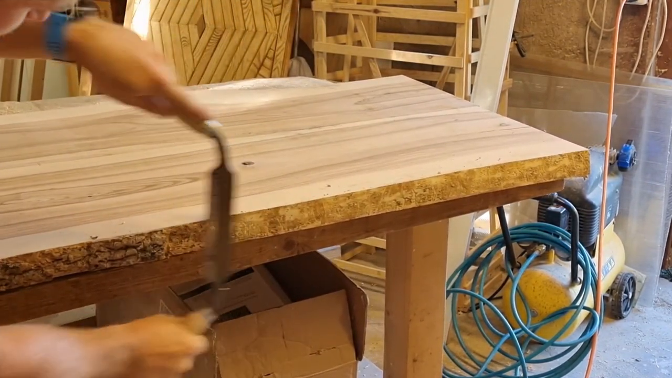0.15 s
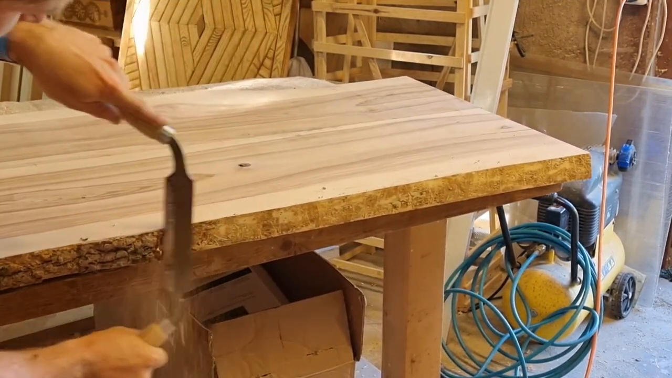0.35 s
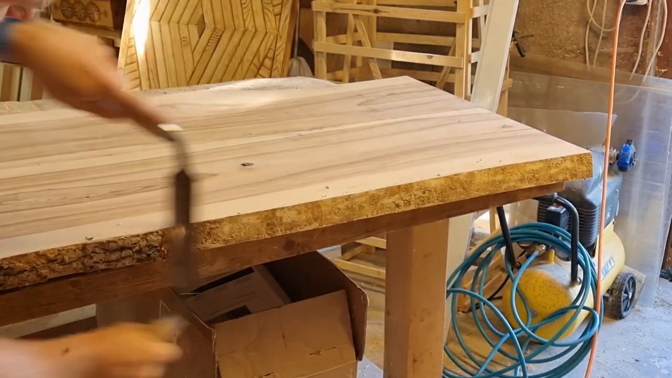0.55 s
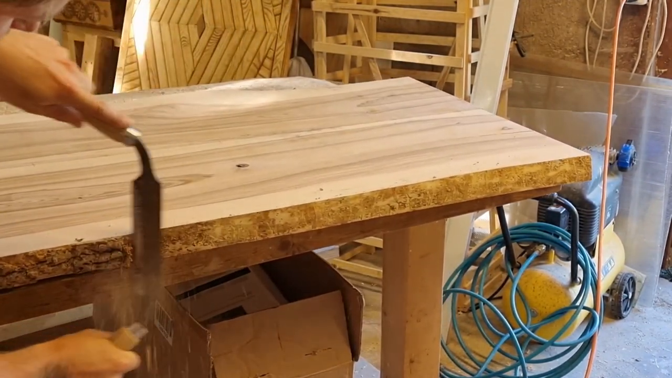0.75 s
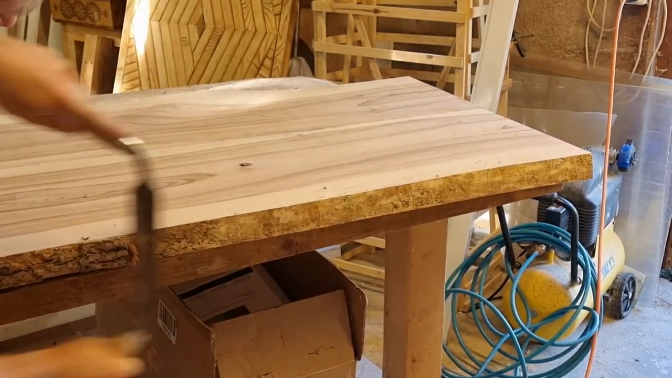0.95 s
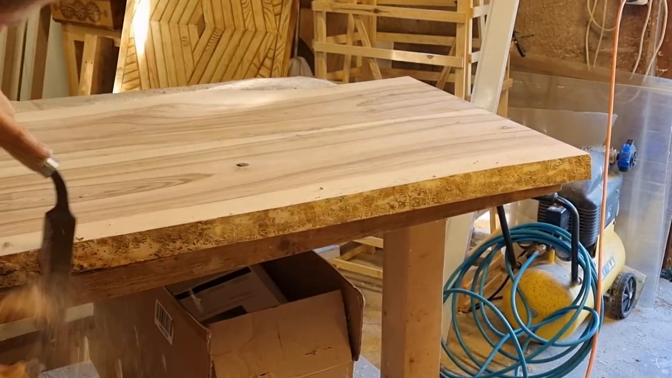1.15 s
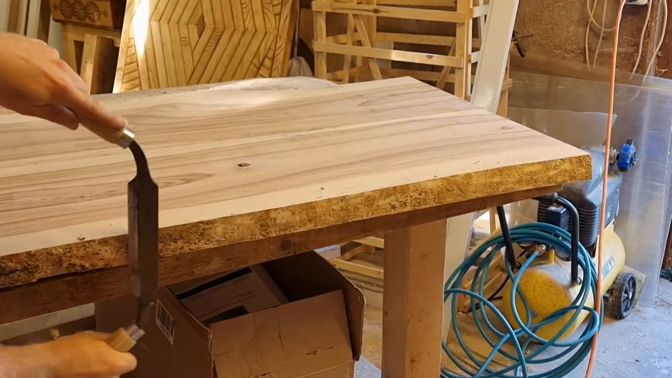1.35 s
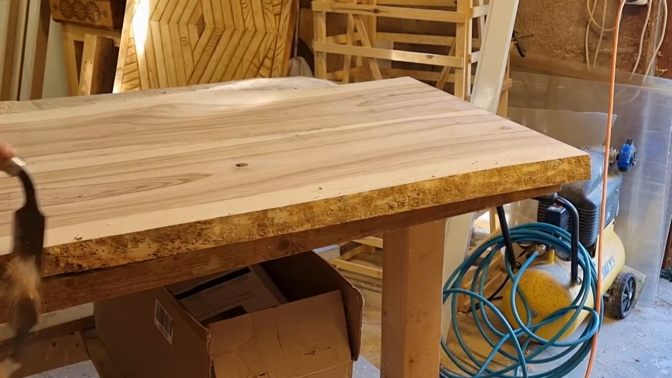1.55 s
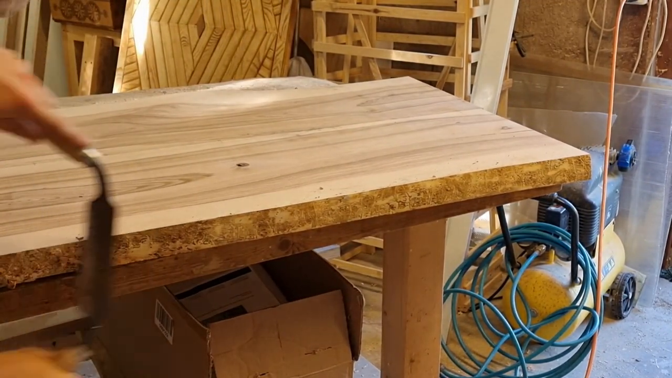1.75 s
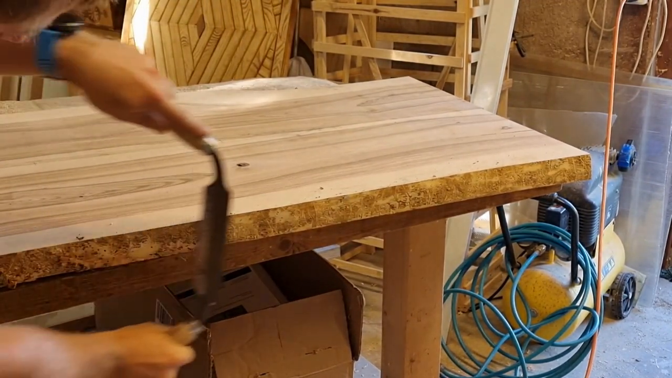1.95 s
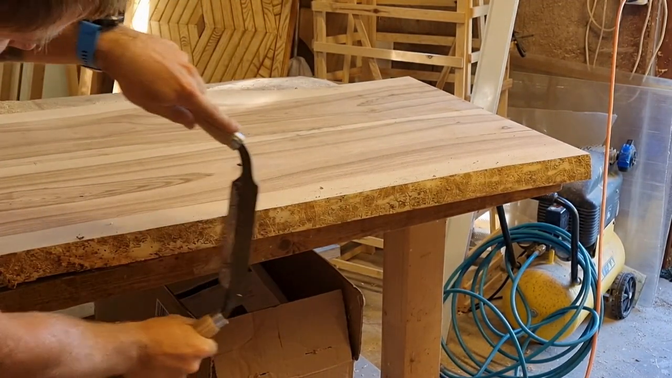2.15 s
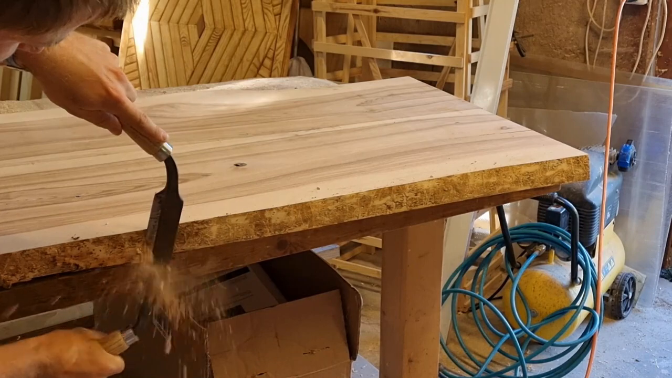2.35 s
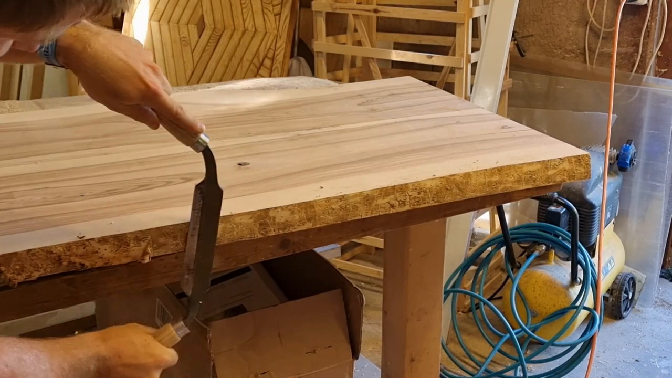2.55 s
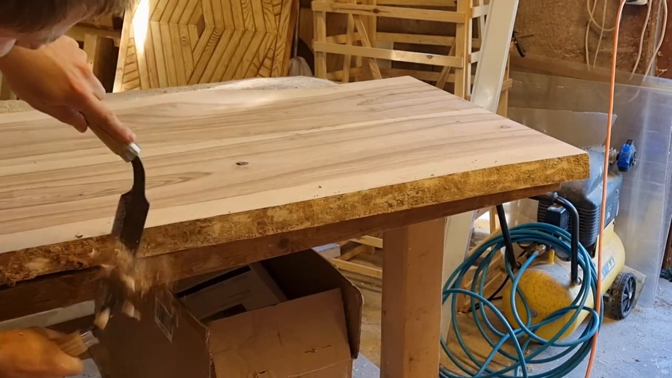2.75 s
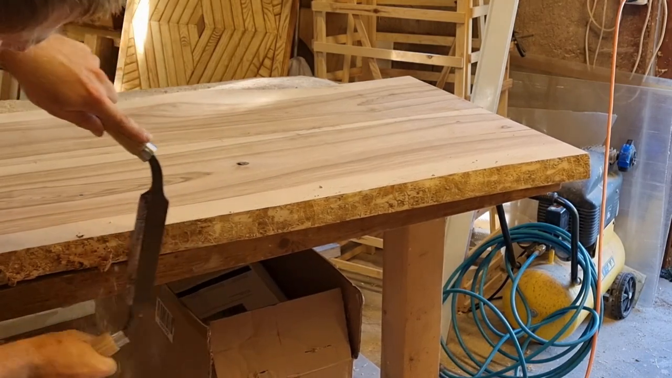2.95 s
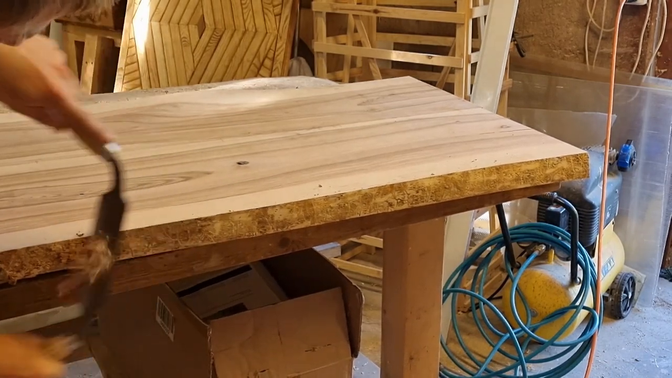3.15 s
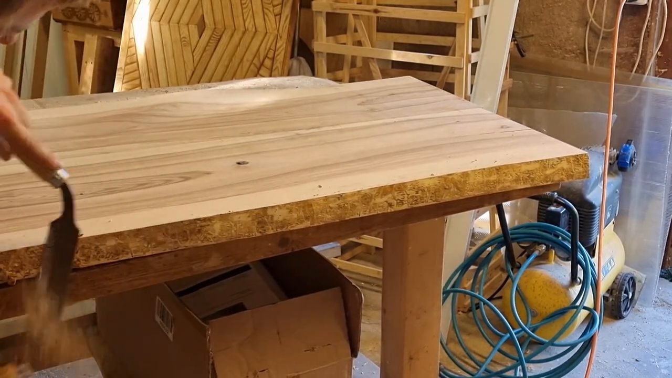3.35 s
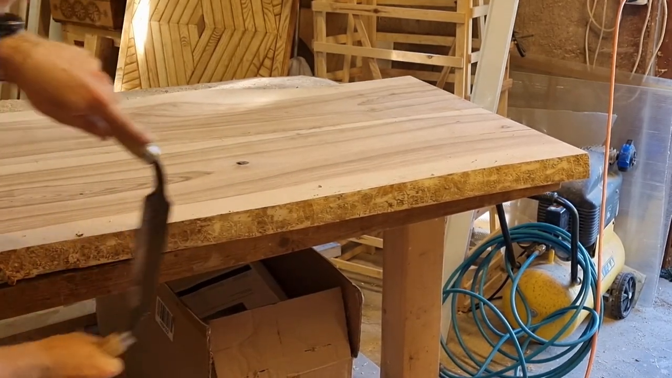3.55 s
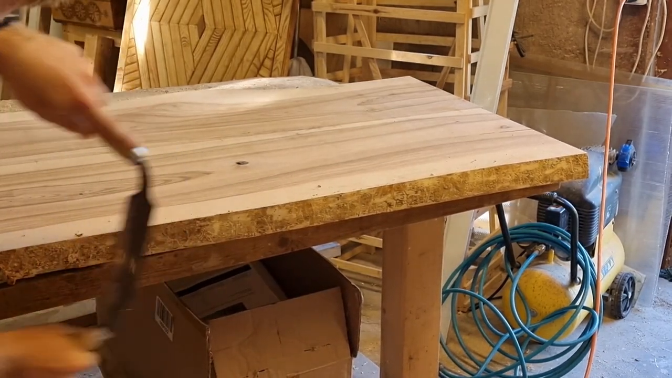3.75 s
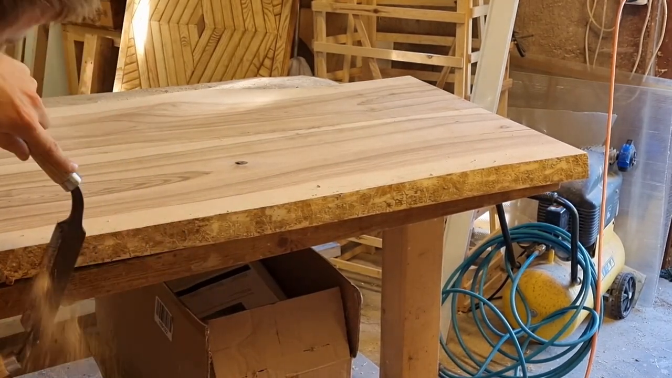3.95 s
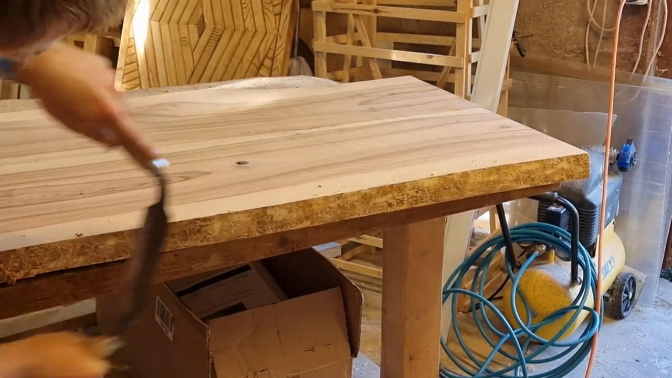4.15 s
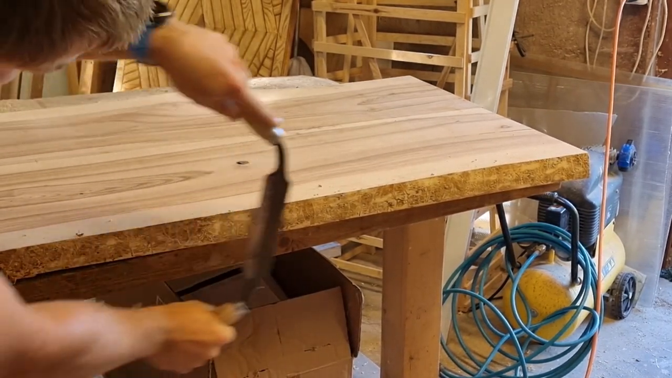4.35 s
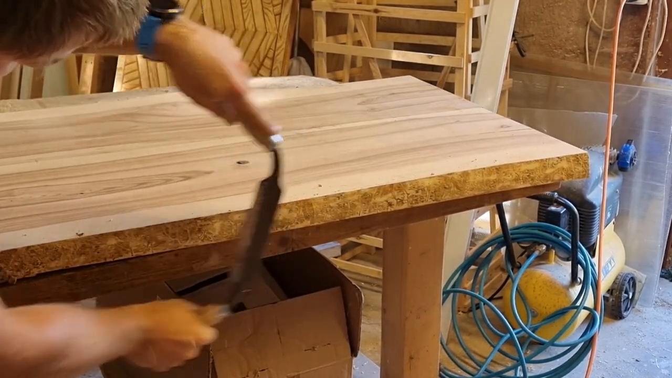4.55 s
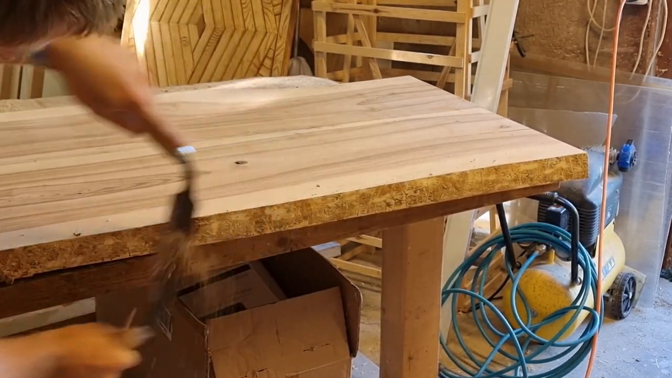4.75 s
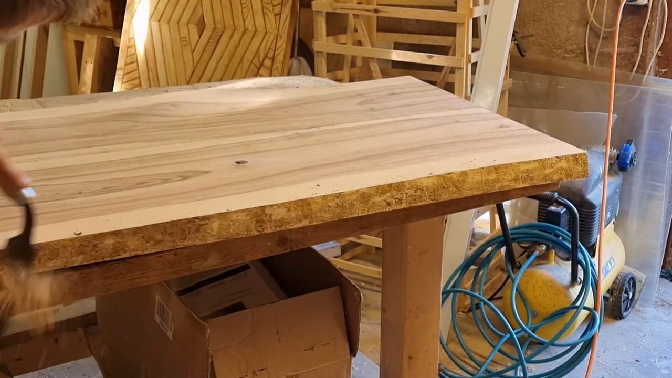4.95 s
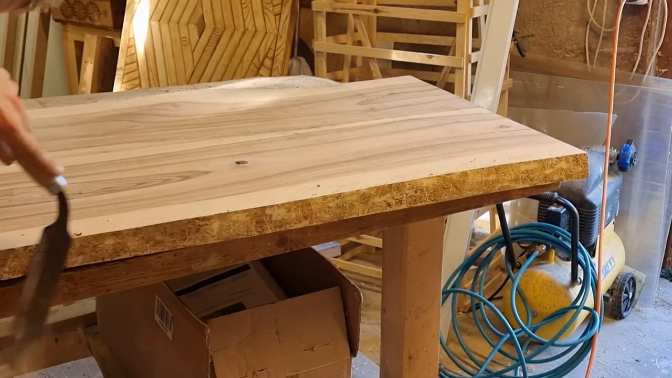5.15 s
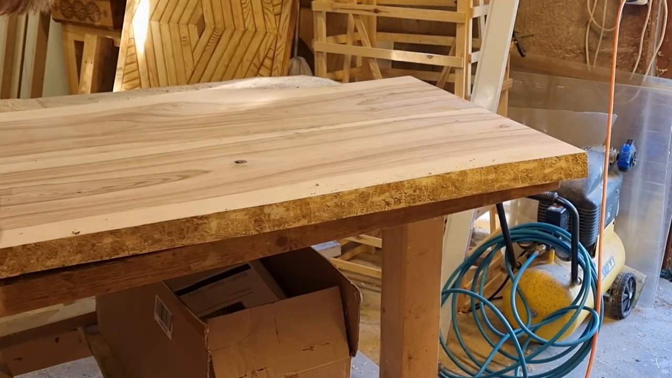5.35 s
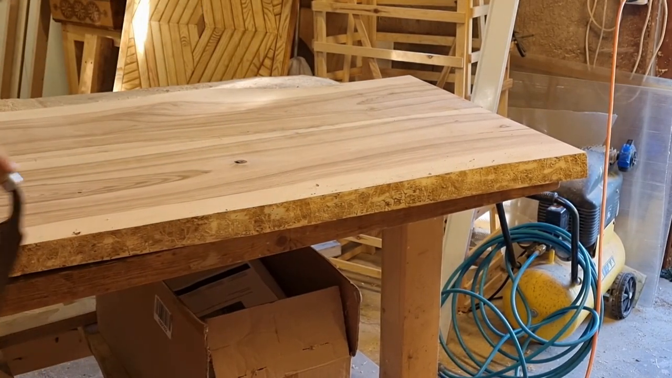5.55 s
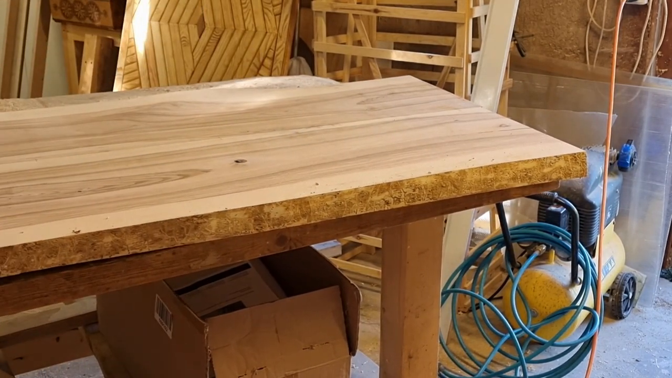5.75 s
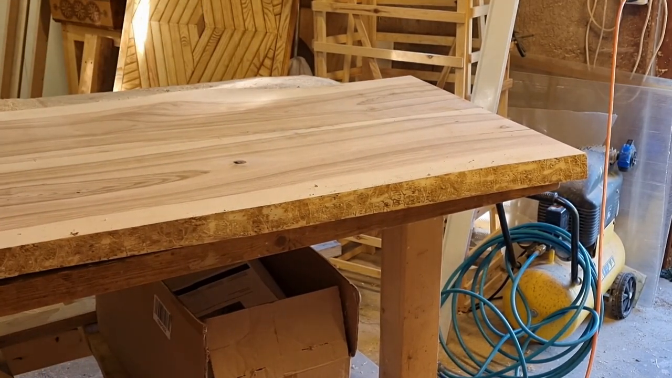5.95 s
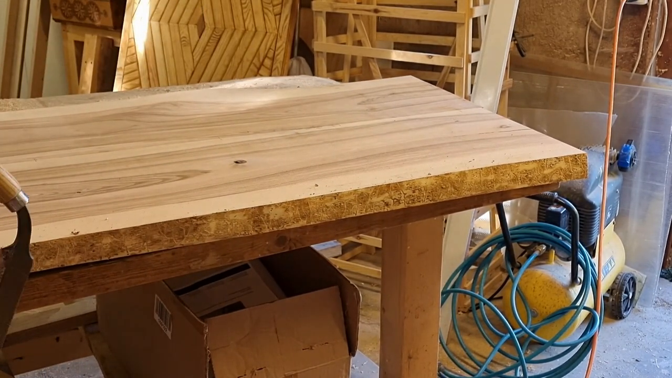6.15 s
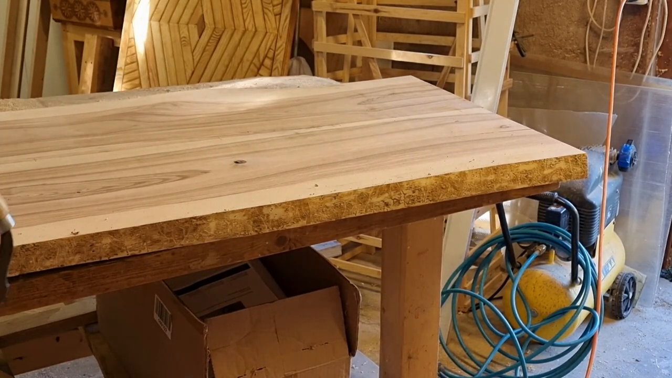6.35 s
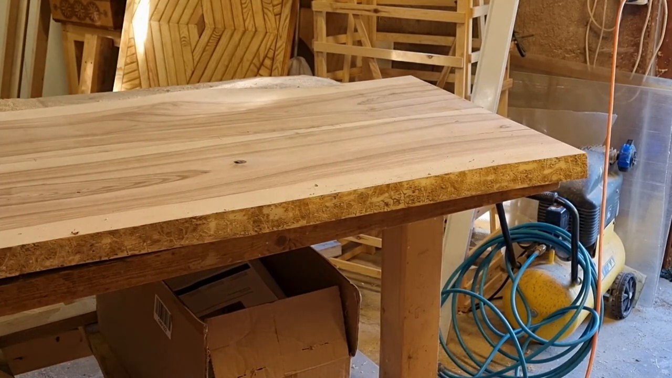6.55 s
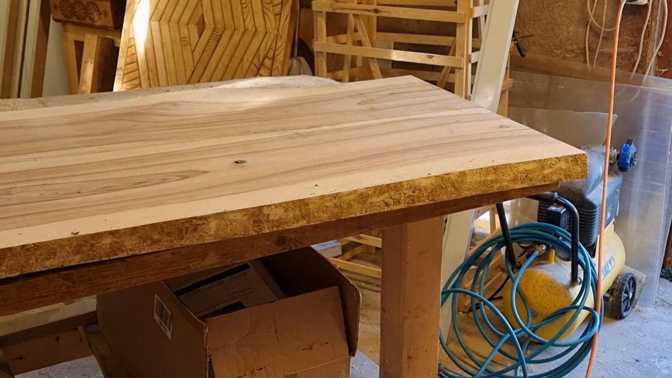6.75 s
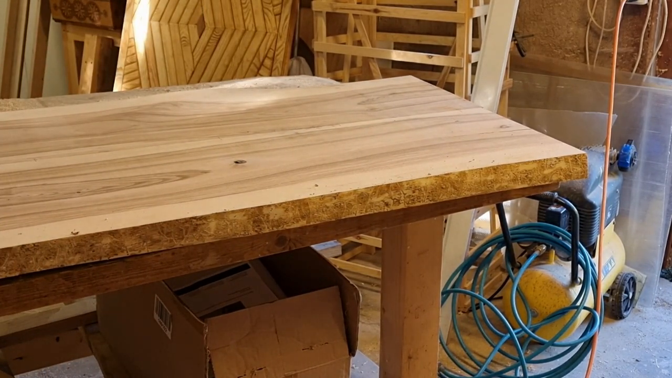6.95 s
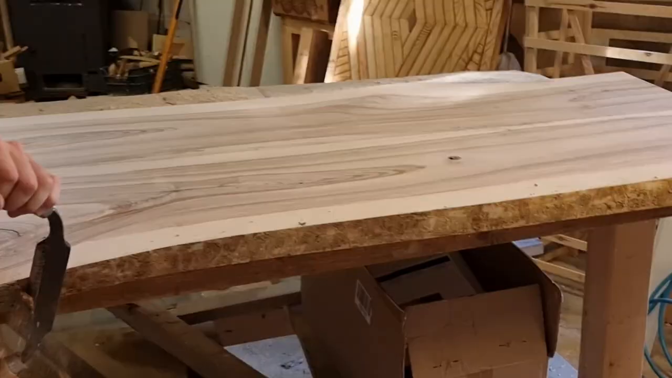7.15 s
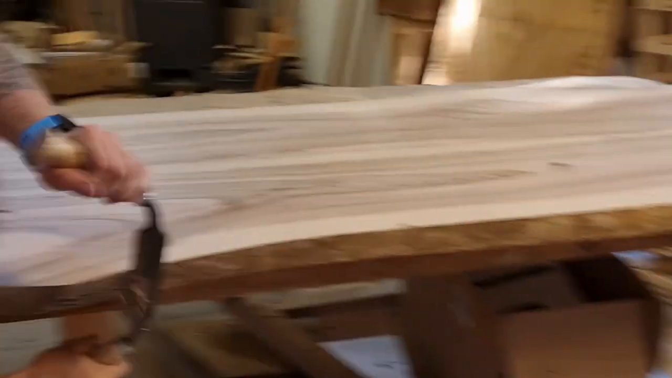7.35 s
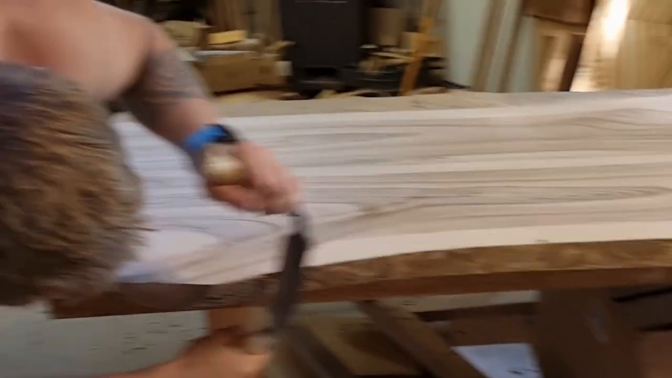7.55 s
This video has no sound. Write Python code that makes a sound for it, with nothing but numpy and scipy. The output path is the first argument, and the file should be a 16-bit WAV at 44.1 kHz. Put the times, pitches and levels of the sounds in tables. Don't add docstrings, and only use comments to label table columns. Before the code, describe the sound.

Close scraping of a blade along a wood edge, fibres ripping brightly, slab shuddering, crumbs trickling, then low handling rumble at the end.

```python
import sys
import numpy as np
from scipy import signal
from scipy.fft import rfft, irfft, next_fast_len
from scipy.io import wavfile
from scipy.ndimage import uniform_filter1d

SR = 44100
rng = np.random.default_rng(int(sys.argv[2]) if len(sys.argv) > 2 else 0)


def makeup_ratio(level_db):
    decades = np.asarray(level_db, float) / 20
    return 10 ** decades


def to_wav(s):
    ch = np.atleast_2d(s).T
    pcm = np.round(np.clip(ch, -1, 1) * 32767)
    wavfile.write(sys.argv[1], SR, pcm.astype(np.int16))


N = 339570


def level(x):
    return x / np.sqrt(np.mean(x ** 2))


def butter_filter(x, order, edge_hz, kind="low"):
    return signal.sosfilt(signal.butter(order, edge_hz, kind, fs=SR, output="sos"), x)


def colour(x, points):
    hz, db = np.transpose(points)
    size = next_fast_len(N)
    f = np.arange(size // 2 + 1) * SR / size + 1
    gain = makeup_ratio(np.interp(np.log(f), np.log(hz), db))
    return irfft(rfft(x, size) * gain, size)[..., :N]


def pair(alike):
    mid, side = rng.standard_normal((2, N))
    return np.sqrt((1 + alike) / 2) * mid + np.sqrt((1 - alike) / 2) * side * np.array([[1], [-1]])


def drift(per_s):
    k = int(SR / per_s)
    steps = np.repeat(rng.standard_normal(N // k + 1), k)
    return level(uniform_filter1d(steps, k)[:N])


def grit(per_s, scatter_db, smear_s):
    sizes = makeup_ratio(scatter_db * np.minimum(rng.exponential(size=N), 4))
    slips = (rng.random(N) < per_s / SR) * sizes
    return level(signal.lfilter([1], [1, -np.exp(-1 / (smear_s * SR))], slips))


def ring(x, modes, patchy_db=0.):
    out = 0
    for k, (hz, width, db) in enumerate(modes):
        gain = makeup_ratio(db + patchy_db * drift(7))
        out = out + (-1) ** k * gain * signal.lfilter(*signal.iirpeak(hz, hz / width, SR), x)
    return out


# pitch_hz, level_db
SHOP_COLOUR = [(18, -48.5), (30, -16.5), (80, 8), (180, -5.5), (676, -0.5), (1030, -5), (1340, 2.5),
               (5030, -12), (7280, -17), (13000, -17), (15400, -22.5), (16500, -47)]


def shop():
    air = colour(pair(0.2), SHOP_COLOUR)
    swelling = 0
    for edges_hz in [(25, 300), (300, 2500), (2500, 17000)]:
        swelling = swelling + makeup_ratio(2.2 * drift(6)) * butter_filter(air, 2, edges_hz, "band")
    return makeup_ratio(-67) * level(swelling)


def contacts(rows, rule):
    start, rise, hold, force_db, bark_db = np.transpose(rows)[:, :, None]
    age = np.arange(N * 1000 // SR + 2) / 1000 - start - rise
    out = []
    for k, (rise_db, db, held, fall) in enumerate(rule):
        shape = rise_db * np.minimum(age, 0) / rise + held * np.clip(age, 0, hold)
        shape = shape - fall * np.maximum(age - hold, 0)
        bark = bark_db if k == 0 else 0
        layer_db = np.maximum(force_db + db + bark + shape, -150)
        out.append(np.sum(makeup_ratio(2 * layer_db), axis=0))
    return np.array(out)


# start_s, rise_s, hold_s, force_db, bark_db (over the force)
PULLS = [(0.0, 0.00047, 0.0022, -40, -12), (.256, 0.047, 0.056, -33.5, -4), (.67, 0.004, 0.099, -31, 0.5),
         (1.652, 0.0038, 0.045, -36, -2), (2.25, 0.11, 0.05, -31.5, -6.5), (2.786, 0.015, 0.059, -28, -6.5),
         (3.236, 0.02, 0.07, -31, -5), (3.82, .1, 0.062, -31.5, -13.5), (4.99, 0.074, 0.016, -25, -11),
         (5.436, 0.0052, 0.05, -26.5, -9), (5.864, 0.0045, 0.0056, -32.5, -1),
         (7.181, 0.0012, 0.0057, -40, -3), (7.455, 0.0036, 0.085, -29.5, -3),
         (7.575, 0.0012, 0.01, -42, 3.5)]
SLIDES = [(.604, 0.0018, 0.043, -40, -6), (1.04, 0.0014, 0.12, -40.5, -8),
          (1.15, 0.024, 0.0069, -27.5, -1.5), (1.4, 0.077, 0.034, -48.5, 1.5),
          (1.506, 0.0014, 0.12, -36.5, -1), (2.092, 0.0013, 0.011, -39, -8), (2.74, 0.04, 0.014, -39, -6.5),
          (3.092, .002, 0.0093, -54.5, 5), (3.2, 0.012, 0.025, -46.5, -11),
          (3.734, 0.0018, 0.0092, -51, 10), (4.407, 0.00097, 0.005, -40, 0),
          (4.695, 0.04, 0.135, -41.5, -15), (4.86, 0.054, 0.13, -41, -8.5), (5.8, 0.065, 0.02, -28, -10),
          (6.089, 0.00088, 0.026, -35.5, -13), (6.288, 0.0009, 0.013, -25, -12.5),
          (7.39, 0.039, 0.0075, -36.5, -2.5)]
RESTS = [(0.0, 0.00068, 0.0083, -50.5, -14), (.15, 0.014, 0.077, -66.5, -22),
         (1.355, 0.0034, 0.013, -62.5, 2), (1.84, 0.036, 0.2, -71, -22.5), (2.14, 0.013, 0.037, -63.5, -14),
         (2.638, .003, 0.022, -59, -25), (3.46, 0.017, 0.057, -71, -20), (3.652, 0.0067, 0.086, -54, -22),
         (4.22, 0.031, 0.082, -64.5, -14.5), (4.33, 0.011, 0.027, -54, 0), (4.62, 0.011, 0.087, -70, -16),
         (5.24, .03, 0.39, -56, -10), (5.69, 0.099, 0.19, -51.5, -32.5), (5.92, 0.026, 0.2, -78, -30),
         (7.181, 0.0013, 0.027, -43.5, -12), (7.3, 0.016, 0.18, -55, -1)]
GRAZES = [
    (.235, 0.0069, .03, -49.5, -23),
    (1.064, 0.0083, 0.052, -24, -9),
    (2.26, 0.037, 0.1, -35.5, -34),
    (3.84, 0.0045, 0.13, -33, -26),
    (5.78, 0.0074, 0.023, -29.5, -30.5),
    (6.262, 0.0033, .02, -37, -32),
    (6.42, 0.0035, 0.074, -39.5, -15.5),
    (6.59, 0.011, 0.042, -41.5, -8.5),
    (6.985, 0.0063, 0.038, -45, -15),
    (7.26, 0.0047, 0.011, -50.5, -1.5),
]
# start_s, length_s, level_db
CRUMBS = [(0.912, .12, -55.5), (1.796, 0.085, -51), (1.87, 0.03, -50), (3.387, 0.37, -60.5),
          (0.084, .1, -66), (1.33, .12, -62), (3.86, 0.11, -48), (1.52, .1, -46), (4.43, .03, -54),
          (4.48, .02, -56), (4.535, 0.038, -55), (4.62, 0.028, -53), (6.47, 0.23, -55.5),
          (6.738, 0.2, -54.5), (0.39, .12, -53), (5.7, 0.027, -60), (7.03, 0.13, -63), (5.2, 0.23, -68),
          (5.6, .15, -66)]
# rise_db, level_db (over the force), held_db_per_s, release_db_per_s
PULL_ANSWER = [
    (31, 4.5, -104.5, 262),
    (16.7, -9, 55, 178.5),
    (20, -1.5, 21.5, 225),
    (14, -17, 14, 148.5),
    (14, -16.5, 40.5, 150.5),
]
SLIDE_ANSWER = [
    (30, -5, 8.5, 220),
    (16, -6.5, -16.5, 243),
    (20.1, 0.5, -8.5, 237),
    (14, -22, 8.5, 320),
    (14, -15.5, 14.5, 110),
]
REST_ANSWER = [
    (25, -8.5, 2, 370),
    (18.2, 6.5, -13.5, 208),
    (19.8, 2, -6, 660),
    (14, -2.5, -3.5, 140),
    (16.2, 13.5, -9.5, 280),
]
LIGHT_ANSWER = [
    (24.7, 2.5, -21.5, 290),
    (18.1, -15.5, -6.5, 240),
    (20.2, -3, -12.5, 200),
    (14, -38.5, 1.5, 150),
    (16, -16.5, -7.5, 180),
]


def effort():
    crumb_rise_s, crumb_hiss_db = 0.031, -7.5
    crumbs = [(start, crumb_rise_s, length, db, crumb_hiss_db) for start, length, db in CRUMBS]
    power = contacts(PULLS, PULL_ANSWER) + contacts(SLIDES, SLIDE_ANSWER)
    power = power + contacts(RESTS, REST_ANSWER) + contacts(GRAZES + crumbs, LIGHT_ANSWER)
    ms = np.arange(N) * 1000 / SR
    return [np.interp(ms, np.arange(len(p)), 10 * np.log10(p)) for p in power]


# pitch_hz, tilt_db
TEAR_COLOUR = [(1470, -8.5), (2500, -4), (3460, 1), (4590, -2.5), (4970, 2), (8500, -12), (9200, -10.5),
               (10700, -9), (13900, -2), (15900, -10), (16500, -42.5)]


def tearing(db):
    common, out = grit(500, 2.8, 0.0024), 0
    for hz in 2200 * 2 ** np.arange(0, 3.1, .5):
        bursts = 0.63 * common + 0.5 * grit(300, 3.8, 0.001) + 0.45
        out = out + butter_filter(bursts * pair(0.4), 2, [hz / 1.17, hz * 1.146], "band")
    return makeup_ratio(db + 2.0) * level(colour(out, TEAR_COLOUR))


# pitch_hz, width_hz, level_db
SLAB_MODES = [(254.7, 21, 1.5), (326.8, 54.7, 1.5), (345.5, 46, 4), (422, 19, -1), (511, 61, -6.5),
              (591, 19, 0.5), (683, 127, -9)]
# pitch_hz, width_hz, level_db
EDGE_MODES = [(808.3, 47, 7.5), (985, 40.5, 7.5), (1087, 117, 2), (1283, 50, 3), (1454, 48, 1.5),
              (1670, 490, -2.5), (1980, 56, -2), (2067, 35, -6), (2540, 270, -8.5), (2490, 200, -8),
              (3000, 570, -9), (3860, 160, -15)]


def slab(drum_db, chatter_db, body_db):
    low = level(ring((grit(400, 2.1, 0.0011) + 0.51) * pair(1.0), SLAB_MODES))
    body = makeup_ratio(body_db) * level(butter_filter(low, 4, 400))
    drum = butter_filter(makeup_ratio(drum_db + 4.5) * low, 2, [190, 760], "band")
    edge = level(ring((grit(350, 3.5, 0.00074) + 2.94) * pair(0.29), EDGE_MODES, patchy_db=3.0))
    chatter = butter_filter(makeup_ratio(chatter_db - 2.5) * edge, 2, 700, "high")
    return drum + chatter + body


# pitch_hz, level_db
THRUM_COLOUR = [(15, -63), (25, -36.5), (43, -10), (70, -9), (96, 0.5), (124, -2.5), (200, -2.5),
                (260, -32), (440, -120)]


def bench_thrum(thrum_db):
    steady_db = -67
    return np.hypot(makeup_ratio(thrum_db), makeup_ratio(steady_db)) * level(colour(pair(0.95), THRUM_COLOUR))


# start_s, length_s, pitch_hz, level_db
SINGING = [(.0, 0.021, 560, -45), (0.157, .035, 1260, -65.5), (0.238, .05, 1310, -51.5),
           (2.096, 0.031, 950, -52), (2.809, 0.084, 342, -38), (1.19, 0.06, 2080, -35),
           (1.172, 0.02, 1330, -29), (0.769, .05, 1880, -36.5), (0.793, 0.028, 3650, -35.5),
           (4.718, 0.043, 2690, -53), (4.727, 0.13, 3150, -60), (4.893, 0.089, 2050, -55),
           (2.298, 0.064, 1310, -39), (2.297, 0.13, 1920, -46), (4.251, 0.16, 1010, -56),
           (6.286, 0.019, 290, -34), (3.378, .05, 400, -52.5), (3.443, 0.068, 383, -60),
           (3.654, 0.025, 996, -43.5), (3.658, 0.075, 457, -47), (3.658, 0.037, 1450, -64),
           (4.703, 0.058, 1300, -43.5), (4.75, 0.081, 428, -49), (4.717, 0.14, 970, -52.5),
           (4.876, 0.15, 966, -47), (5.461, 0.072, 602, -33.5), (5.562, 0.068, 820, -57),
           (7.183, 0.029, 353, -39), (7.184, 0.014, 543, -35.5), (7.3, 0.088, 480, -49.5),
           (7.38, 0.046, 297, -37.5), (7.425, 0.075, 1030, -36), (7.422, 0.08, 1520, -33.5),
           (7.477, 0.095, 337, -38), (7.51, 0.047, 554, -40.5), (4.83, .16, 10200, -65),
           (4.94, .04, 5900, -56), (7.43, .05, 2950, -46), (7.535, .06, 480, -37), (1.08, .02, 1550, -36),
           (1.08, .04, 700, -36), (1.19, .04, 3000, -38), (3.2, .035, 1500, -50), (3.24, .05, 2080, -41),
           (3.33, .04, 3050, -42), (.6, .2, 1500, -44), (5.45, .08, 1050, -40)]


def singing():
    rise_s, fall_s = 0.005, 0.011
    t = np.arange(SR // 4) / SR
    out = np.zeros(N + len(t))
    for start, length, hz, db in SINGING:
        width_hz = 25 + 0.065 * hz
        rub = rng.standard_normal(len(t))
        tone = level(signal.lfilter(*signal.iirpeak(hz, hz / width_hz, SR), rub))
        shape = np.minimum(t / rise_s, 1) * np.exp(-np.maximum(t - length, 0) / fall_s)
        i = int(start * SR)
        out[i:i + len(t)] += makeup_ratio(db) * shape * tone
    return out[:N]


# start_s, peak_db, pitch_hz, overtone_hz, overtone_db
BLOWS = [(0.3535, -21.5, 924, 1980, -31), (0.371, -20, 1030, 2120, -33), (0.605, -27, 920, 2240, -16),
         (0.656, -11.5, 1100, 2050, -14.5), (0.768, -27.5, 1700, 3500, 2.5), (1.164, -15, 1180, 2280, -5.5),
         (1.185, -18.5, 1356, 2150, -8), (1.415, -26, 1250, 1930, -25), (1.468, -19, 1075, 1920, -26),
         (1.507, -13.5, 1060, 2040, -14.5), (1.557, -13.5, 1070, 1980, -22), (2.785, -13, 1074, 1980, -20),
         (3.238, -24.5, 1050, 2090, -4.5), (3.313, -26, 1300, 2900, -4.5), (3.736, -27, 1230, 2090, -12),
         (4.407, -23, 1296, 2070, -11), (5.446, -25.5, 1100, 2580, -4), (5.512, -24.5, 840, 1990, -28),
         (5.873, -26.5, 1185, 3360, -4), (6.0912, -17, 1000, 2800, -14), (6.2875, -13, 997, 2780, -20.5),
         (6.432, -24.5, 1040, 1990, -18.5), (7.504, -12, 1400, 1950, -16)]
# start_s, peak_db, pitch_hz, overtone_db
CHIPS = [(0.306, -31.5, 1200, -24), (0.492, -37.5, 990, -12.5), (0.508, -39, 1010, -18),
         (0.625, -33, 990, -22), (0.966, -39, 1160, -13), (1.041, -40, 1290, -18), (1.071, -34, 1030, -29),
         (1.355, -36, 1360, -15), (1.534, -36, 1050, -27), (1.586, -27, 1110, -3.5), (1.717, -34, 980, -16),
         (1.654, -29, 1400, -10), (1.773, -36, 1040, -9), (1.871, -36.5, 1090, -4.5),
         (1.907, -36.5, 1040, -5.5), (2.095, -39, 1004, -17), (3.093, -44.5, 1010, -2.5),
         (3.522, -36.5, 1065, -9), (3.661, -39, 1020, -30), (3.624, -54, 993, -20), (3.635, -48, 1160, -15),
         (3.878, -39, 990, -20), (2.172, -53, 1410, -10), (2.917, -40, 1140, -15), (3.298, -32, 970, -16),
         (4.107, -51, 1030, -15), (4.993, -32.5, 920, -18), (5.033, -26.5, 850, -24), (5.28, -45, 826, -20),
         (6.508, -41, 1140, -12), (7.0, -43, 1070, -23), (7.377, -48, 1130, -20), (7.637, -41, 1450, -9),
         (4.713, -38, 1290, -15), (4.74, -36, 974, -12), (4.758, -34, 1300, -15), (4.946, -38, 918, -15),
         (4.51, -34, 1090, -12.5), (4.548, -42.5, 1310, -12), (4.566, -42, 1250, -10),
         (4.588, -48.5, 1050, -1.5), (6.106, -29, 985, -16), (6.117, -33, 1200, -20),
         (6.128, -35, 1000, -25), (6.136, -34, 950, -25), (1.52, -27, 1050, -20), (1.526, -28, 1150, -20),
         (6.174, -30.5, 1120, -28), (6.211, -29, 1050, -28), (6.442, -44, 1080, -17),
         (6.458, -35.5, 1020, -13), (6.561, -39.5, 910, -31), (6.618, -39, 1040, -26),
         (6.633, -33.5, 970, -26), (6.709, -31, 1100, -12.5)]


def strikes():
    chip_over_hz = 2025
    return BLOWS + [(start, db, hz, chip_over_hz, over_db) for start, db, hz, over_db in CHIPS]


# start_s, peak_db, pitch_hz
SNAPS = [(0.3116, -9.5, 12900), (0.6693, -15.5, 5400), (0.6951, -10, 6340), (0.799, -21.5, 3630),
         (1.069, -18.5, 13450), (1.0802, -6.5, 6440), (1.583, -20, 3130), (1.6619, -12.5, 5960),
         (2.3402, -10.5, 10300), (2.37, -11, 12600), (2.3964, -11, 12600), (2.795, -11, 12500),
         (2.8198, -11.5, 5400), (2.831, -12, 7100), (3.2612, -19, 13000), (3.28, -11.5, 6500),
         (3.881, -20, 13100), (3.924, -10.5, 12370), (4.3328, -38, 5870), (5.029, -24, 5840),
         (5.042, -15, 12300), (5.061, -8.5, 5060), (5.437, -8, 4850), (5.467, -14, 5070),
         (6.4902, -31, 4240), (7.184, -27, 4410), (7.46, -18.5, 6300), (7.5, -11, 12900),
         (7.578, -34, 12500), (2.078, -32.5, 5790), (0.2624, -32, 13400), (0.2725, -28.5, 13400),
         (0.281, -16.5, 13300), (.307, -22, 2800), (.678, -18, 5100), (1.575, -19, 3200),
         (1.829, -44, 6000), (2.085, -45, 9100), (2.123, -45, 13100), (2.1306, -30, 6000),
         (2.1306, -42.5, 13000), (2.173, -38.5, 11000), (2.181, -40, 4000), (2.211, -42.5, 14000),
         (2.304, -27, 13200), (2.3234, -12, 13400), (3.061, -39.5, 12240), (3.068, -50, 10000),
         (3.4293, -27.5, 2400), (4.565, -44, 12900), (5.2765, -52, 10000), (5.4302, -20.5, 5400),
         (5.6527, -52, 4500), (5.739, -46.5, 6350), (5.85, -34, 5700), (5.8898, -18.5, 5900),
         (7.04, -40, 4500), (7.589, -19.5, 14200), (4.637, -48, 10920), (.85, -45, 12500)]
# start_s, peak_db, pitch_hz
SPLINTERS = [(7.468, -15, 3370), (7.5355, -14, 2200), (7.537, -14, 3700), (7.545, -19, 3000),
             (7.563, -18, 2800), (3.322, -16, 3050), (1.443, -36, 2600), (6.265, -38, 2900),
             (1.166, -13, 3300), (1.189, -16, 3100), (1.2, -19, 3000), (.78, -22, 3300), (6.71, -30, 2100)]


def snaps():
    tick_hz, tick_db, tick_per_over, tick_lead_s = 3200, -1, 0.84, 0.0008
    ticks = [(start - tick_lead_s, db + tick_db + tick_per_over * over_db, tick_hz)
             for start, db, _, _, over_db in strikes()]
    t = np.arange(400) / SR
    out = np.zeros((2, N + len(t)))
    for start, db, hz in SNAPS + ticks + SPLINTERS:
        hiss = rng.standard_normal((2, len(t)))
        leaky = hiss + 0.011 * hiss[::-1]
        burst = signal.lfilter(*signal.iirpeak(hz, 2.2, SR), leaky * np.exp(-t / 0.0017))
        i = int(start * SR)
        out[:, i:i + len(t)] += makeup_ratio(db + np.array([[1.5], [-1.5]])) * burst / np.abs(burst).max()
    return out[:, :N]


# delay_s, level_db
ECHOES = [
    (.0082, -10.5),
    (.0142, -17),
    (.0255, -19),
]


def knocks():
    t = np.arange(2000) / SR
    out = np.zeros(N + 4000)
    swell = 1 - np.exp(-(t / 0.001) ** 2)
    for start, db, hz, over_hz, over_db in strikes():
        def sine(pitch_hz, phase=0.):
            return np.sin(2 * np.pi * pitch_hz * t + phase)

        def decay(from_db, t60_s):
            return makeup_ratio(from_db - 60 * t / t60_s)

        body = sine(hz) * (decay(0, 0.0105) + decay(-19, 0.03))
        body = body + 0.55 * sine(1.3 * hz) * decay(0, 0.011)
        rattle = butter_filter(rng.standard_normal(len(t)), 2, [hz / 1.25, hz * 1.8], "band")
        body = body + rattle * decay(-12, 0.05)
        body = body + sine(0.42 * hz) * decay(-15.5, 0.012)
        over = 0.45 * sine(over_hz, 3 * rng.standard_normal()) * decay(0, 0.014)
        crack = butter_filter(rng.standard_normal(len(t)), 2, [over_hz / 1.2, over_hz * 1.35], "band")
        crack = crack * decay(2.5, 0.011)
        knock = makeup_ratio(db + 13.5) * swell * (body + makeup_ratio(over_db + 9.5) * (over + crack))
        for late, echo_db in [(0, 0)] + ECHOES:
            scatter = 1 + 0.1 * np.tanh(rng.standard_normal())
            i = int((start + late * scatter) * SR)
            out[i:i + len(t)] += makeup_ratio(echo_db) * knock
    return out[:N]


# start_s, peak_db, pitch_hz
HANDLING = [(7.184, -23, 56), (7.218, -21, 52), (7.263, -29, 57), (7.302, -19, 62.6), (7.338, -21, 58),
            (7.368, -30, 55), (7.384, -18.5, 62.6), (7.44, -26, 55), (7.477, -24, 52.6), (7.519, -37, 55),
            (7.564, -32, 52), (7.639, -38, 55)]


def handling():
    t = np.arange(N) / SR
    bumps = 0
    for start, db, hz in HANDLING:
        age = np.maximum(t - start, 0)
        over = makeup_ratio(-3 - 60 * age / 0.12) * np.sin(2 * np.pi * 2.2 * hz * age)
        bumps = bumps + makeup_ratio(db - 60 * age / 0.12) * (np.sin(2 * np.pi * hz * age) + over)
    return butter_filter(bumps, 2, 124) * makeup_ratio(np.array([[-7.5], [0]]))


def room(x, low_t60, high_t60):
    t = np.arange(SR // 2) / SR
    sparse = rng.random(len(t)) < 0.012 + 0.6 * t
    shared = 0.69 * rng.uniform(-0.64, 1, len(t))
    walls = (rng.uniform(-1.22, 1, (2, len(t))) + shared) * sparse * (t > 0.004)
    bass = butter_filter(walls, 1, 2500)
    echo = bass * makeup_ratio(-60 * t / low_t60) + (walls - bass) * makeup_ratio(-60 * t / high_t60)
    return signal.fftconvolve(x, echo / np.sqrt(np.sum(echo ** 2) / 2), axes=1)[:, :N]


def scene():
    tear_db, drum_db, chatter_db, thrum_db, body_db = effort()
    scrape = tearing(tear_db) + slab(drum_db, chatter_db, body_db) + singing()
    blows = snaps() + knocks()
    echoes = room(makeup_ratio(-8) * scrape + makeup_ratio(-11) * blows, low_t60=0.26, high_t60=0.14)
    return shop() + scrape + bench_thrum(thrum_db) + blows + echoes + handling()


def low_pass(x):
    return signal.sosfilt(signal.butter(12, 16820, fs=SR, output="sos"), x)


def record(dry):
    lag = 5
    ports = np.array([dry[0], np.r_[np.zeros(lag), dry[1, :-lag]]])
    ports = butter_filter(ports, 3, 42, "high")
    ports = signal.sosfilt(signal.ellip(8, .2, 30, 15940, fs=SR, output="sos"), ports)
    return low_pass(ports)


dry = scene()
out = record(dry)
to_wav(out)
```